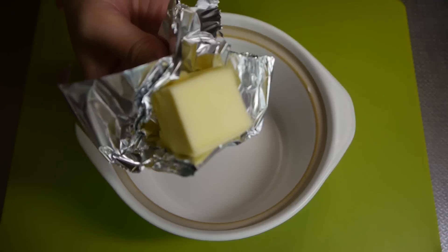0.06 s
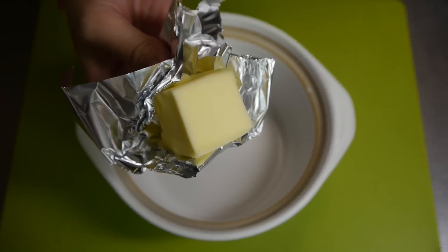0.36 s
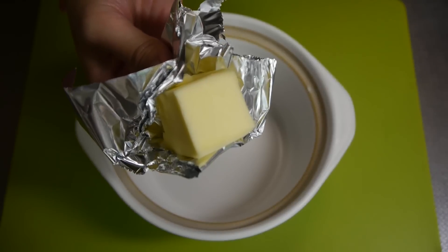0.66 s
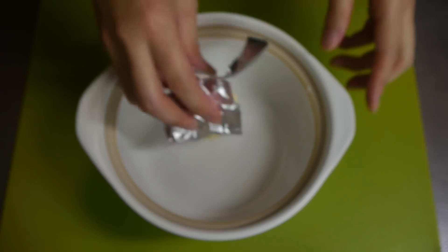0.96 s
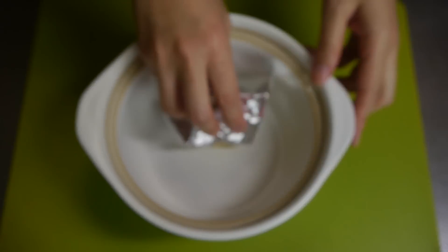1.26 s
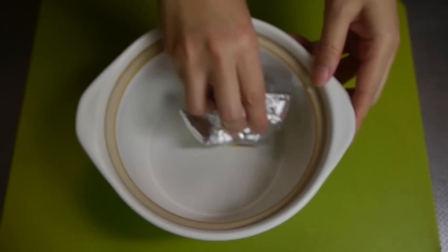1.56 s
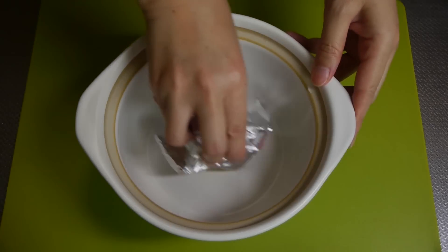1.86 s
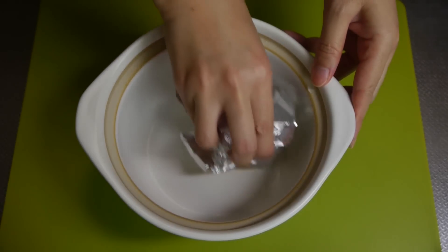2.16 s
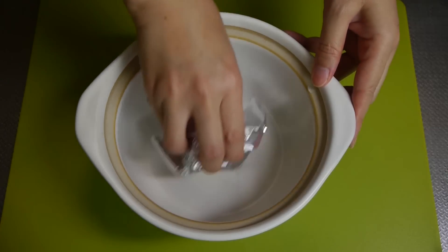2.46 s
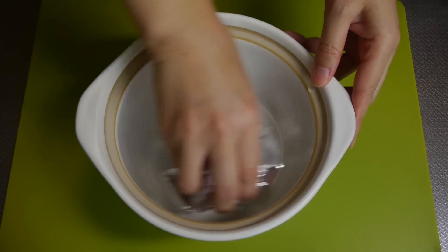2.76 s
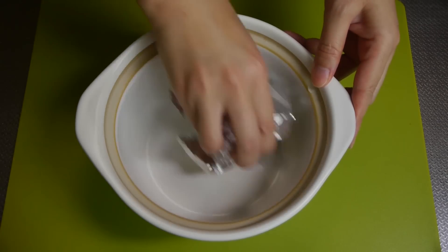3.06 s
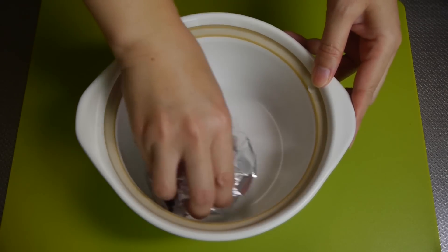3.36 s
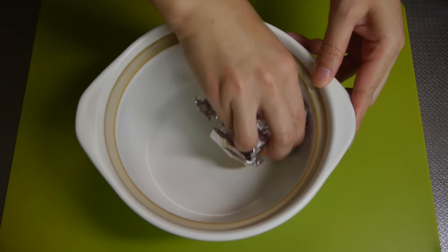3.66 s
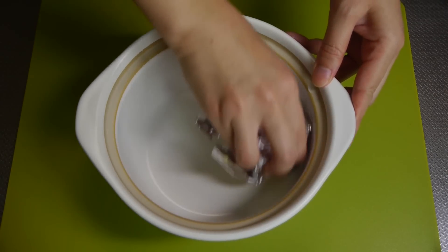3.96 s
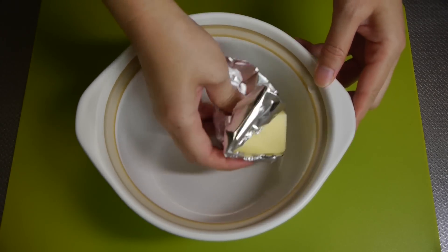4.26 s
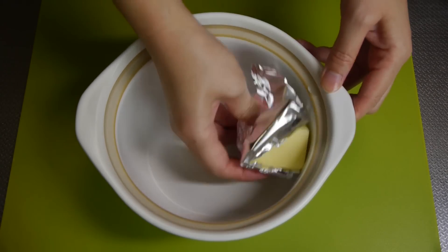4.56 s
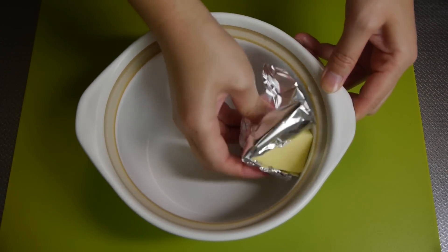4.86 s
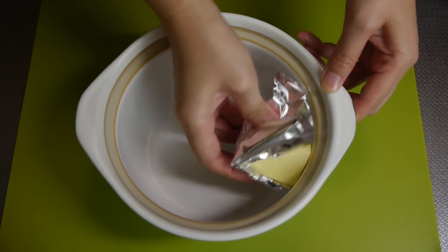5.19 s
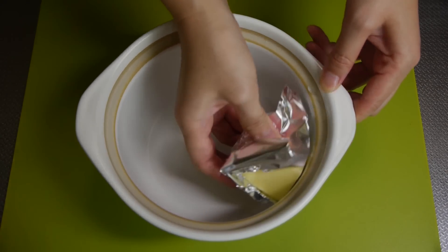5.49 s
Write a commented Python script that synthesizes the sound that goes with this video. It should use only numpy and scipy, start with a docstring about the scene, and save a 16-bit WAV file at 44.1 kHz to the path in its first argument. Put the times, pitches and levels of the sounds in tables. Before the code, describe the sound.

For the first second there is only a low kitchen rumble with a very faint electrical whine, a soft bump and a few tiny ticks and squeaks. At about 1 second, the foil around a block of butter crinkles sharply and scrapes over the glaze of a ceramic pot in quick, hissy, slightly hollow strokes. The pot bumps softly on its mat near 1.3 seconds. From 1.8 to 2.9 seconds the rubbing is lighter, with scattered crisp snaps and faint sticky smacks of butter. The strokes then build, strongest between 3.5 and 4.1 seconds, with crunchy crackles. Around 4.4 seconds comes a dull smack, with soft bumps just after, and the scraping shifts in tone. Short, uneven scrapes and crinkles continue until about 5.5 seconds. The sound is close and fairly dry, and the background dips slightly whenever the foil gets loud.

```python
"""Buttering a ceramic pot

A block of butter, held by its foil wrapper, is rubbed round a ceramic pot in a small kitchen.
Creases snap under the fingers, the grip squeaks, foil scrapes the glaze in strokes and the butter
smacks; the hollow between hand and pot colours the rubbing. The pot bumps softly on its mat, over a
room rumble and a faint whine. An automatic gain control ducks everything when the foil gets loud."""
import sys
import numpy as np
from scipy import signal
from scipy.fft import rfft, irfft
from scipy.io import wavfile
from scipy.ndimage import uniform_filter1d, map_coordinates

SR = 44100
rng = np.random.default_rng(int(sys.argv[2]) if len(sys.argv) > 2 else 0)


def wav_out(sig):
    """Save sig, one row per channel (or a flat mono array), as 16-bit PCM at SR to the path in sys.argv[1]."""
    wavfile.write(sys.argv[1], SR, np.round(np.clip(np.atleast_2d(sig).T, -1, 1) * 32767).astype(np.int16))


N = 243873
TIME = np.arange(N) / SR
CUTOFF_HZ = 16300

# The kitchen's rumble. Each row: frequency in Hz, relative level in dB.
ROOM_SPECTRUM = [(25, -18), (60, -4), (130, 0), (200, -1), (275, 3), (350, -7), (550, -11), (780, -12.5),
                 (1200, -20), (2500, -24.5), (4500, -26.5), (7000, -30.5), (16000, -34)]
# Faint electrical whine. Each row: pitch in Hz, RMS level in dB.
WHINE_TONES = [(3300, -73), (3348, -67), (4151, -74), (4301, -70), (4700, -72)]
# Soft bumps of hand and pot on the mat. Each row: start in seconds, strength in dB, low-pass in Hz.
MAT_BUMPS = [(0.004, -17.5, 76), (0.081, -19, 69.6), (1.339, -15.5, 300), (2.558, -34, 300),
             (3.051, -25, 200), (4.419, -27, 200), (4.674, -24.5, 150), (4.838, -47, 250)]
# The pot ringing on mat and worktop. Each row: pitch in Hz, gain in dB, 60 dB decay in seconds.
WORKTOP_MODES = [(37.5, -19, 0.23), (74, -3.5, 0.16), (144, -5.5, 0.26), (192, 5, 0.086),
                 (250.5, 1.5, 0.087)]
# The arm's weight shaking the worktop. Each row: time in seconds, level in dB.
ARM_TREMBLE = [(0, -40), (1.2, -75), (1.4, -50.5), (2.4, -47.5), (3.3, -58), (3.75, -39.5), (4.3, -58),
               (4.5, -35.5), (4.85, -37.5), (5.1, -49)]
# Creases buckling. Each row: start in seconds, level in dB, body in dB relative to that level,
# pitch of the foil facet in Hz.
CREASE_SNAPS = [(0.0222, -41.5, -2.5, 3970), (0.081, -51.5, 4.5, 3900), (0.802, -51, 3, 5240),
                (0.9608, -29, 5.5, 2900), (0.9887, -9, -10, 7340), (1.0143, -10.5, -13, 4100),
                (1.064, -12, -3.5, 4370), (1.124, -15.5, -4.5, 4400), (1.206, -16.5, -14, 10800),
                (1.2876, -12.5, -23, 3470), (1.4092, -9, -8, 10800), (1.5714, -12, -13, 8900),
                (1.611, -17.5, -2.5, 2900), (1.6258, -15, -15, 7900), (1.7565, -15.5, -3, 4000),
                (1.774, -19, -15, 11100), (1.801, -20, -9, 3140), (1.872, -21.5, -12, 11400),
                (1.899, -22, -45, 6260), (1.9626, -32, -2, 6100), (1.9928, -22.5, -19, 8470),
                (2.012, -18.5, -10.5, 10500), (2.0477, -30, -6, 9500), (2.182, -18, -12, 10600),
                (2.221, -16.5, -11, 8500), (2.2403, -13.5, -39, 8000), (2.251, -19, -4, 6600),
                (2.2916, -18, -24, 9300), (2.317, -18, -13, 7520), (2.3366, -22.5, -28, 4700),
                (2.3665, -21.5, -20, 6270), (2.388, -20, -15, 9700), (2.4226, -12.5, -9.5, 6100),
                (2.4544, -22.5, -20, 9100), (2.4757, -24, -25, 7100), (2.4997, -22, -13, 8300),
                (2.51, -28.5, -8, 3320), (2.547, -28.5, -4.5, 4540), (2.558, -26.5, -16, 5900),
                (2.598, -22.5, -29, 13000), (2.7108, -19.5, -12, 4770), (2.814, -26, -18, 6300),
                (2.8518, -29, -10, 6000), (2.869, -26.5, -10, 7550), (2.895, -22.5, -14, 8550),
                (2.9263, -11, -5.5, 9350), (2.929, -12, -12, 2400), (3.1292, -12.5, -14, 3900),
                (3.1574, -8.5, -14.5, 5900), (3.1804, -21.5, -21, 4970), (3.247, -21, -16.5, 8000),
                (3.2625, -7.5, -4.5, 3700), (3.2932, -14, -6.5, 4130), (3.4988, -11, -18, 8400),
                (3.5249, -6.5, -18, 5750), (3.6704, -16, -6.5, 3600), (3.7457, -14, 0.5, 3450),
                (3.95, -12.5, -30, 9300), (4.004, -11, -11, 4800), (4.19, -22, -13, 7460),
                (4.245, -24, -14, 9000), (4.274, -15.5, -32, 6840), (4.3142, -8.5, -41, 7900),
                (4.415, -14.5, -11, 2820), (4.45, -15.5, -3.5, 3600), (4.539, -31, -20, 9000),
                (4.5606, -14.5, -13, 3300), (4.754, -13.5, -8.5, 3300), (4.769, -22, -12, 3500),
                (4.783, -14, -9, 3580), (4.8419, -10.5, -23, 7650), (4.976, -16, -21, 9400),
                (5.0487, -21, -22, 4940), (5.2773, -14.5, -22, 4300)]
# The sharp and the dull part of a snap. Each row: frequency in Hz, relative level in dB.
CRACK_SPECTRUM = [(1500, -41), (3200, 2), (6000, 3), (9500, 3.5), (12000, -2), (16000, -12)]
BODY_SPECTRUM = [(350, -14), (620, -17), (820, -7.5), (1150, -6), (1650, -8.5), (3000, -0.5), (4500, -12.5),
                 (9000, -40)]
# Air ringing between hand and pot, with the block flat on the bottom or tipped against the wall.
# Each row: pitch in Hz, width in Hz, gain in dB.
FLAT_HOLLOW_MODES = [(777, 66, 3), (918, 107, -2), (1225, 62, -6.5), (1720, 190, 5), (2261, 44, 1.5),
                     (2700, 79, -33), (3560, 230, -8), (4400, 100, -37.5), (6260, 160, -36.5)]
TIPPED_HOLLOW_MODES = [(790, 50, -18), (1020, 66, -6), (1796, 150, 3.5), (2130, 99, -10), (2210, 180, 0),
                       (3610, 100, -6), (4660, 320, -7), (6940, 160, -3), (7940, 200, -31)]
# Faint squeaks of the grip. Each row: start in seconds, peak level in dB, pitch in Hz.
GRIP_SQUEAKS = [(0.698, -47, 2100), (0.706, -42, 780), (0.731, -50, 2190), (0.764, -55, 2150)]
# Foil resting lightly on the glaze between strokes. Each row: time in seconds, hiss level in dB.
LIGHT_CONTACT = [(0.94, -90), (0.99, -39), (1.72, -48), (1.84, -50), (1.92, -45.5), (2.15, -43.5),
                 (2.26, -37.5), (2.57, -50.5), (2.76, -45), (2.9, -34.5), (3.07, -33.5), (3.22, -39),
                 (3.47, -60), (3.89, -33), (3.98, -47), (4.15, -39.5), (4.27, -47.5), (5.5, -52)]
# Strokes of foil over glaze. Each row: start, rise and length in seconds, mid-stroke hiss in dB,
# swell across the stroke in dB, then rasp and low ring in dB relative to the hiss.
FOIL_STROKES = [(0.959, 0.006, 0.061, -21.5, 3, -6.5, -5.5), (1.027, 0.025, 0.14, -20, 5, -0.5, -4),
                (1.18, 0.017, 0.067, -26.5, 0.5, 3.5, -6.5), (1.24, 0.027, 0.15, -21, -3, 2.5, 0.5),
                (1.399, 0.02, 0.091, -26.5, 4.5, 2, 0.5), (1.476, 0.02, 0.094, -15, -1, -1, -7.5),
                (1.627, 0.037, 0.11, -15.5, -8.5, -6, -13), (2.595, 0.015, 0.079, -21.5, 3, -8.5, -9.5),
                (2.908, 0.0094, 0.083, -18.5, 4.5, -2, -13.5), (3.261, 0.0025, 0.095, -20, -7, -3.5, -23),
                (3.38, 0.021, 0.02, -23, 3.5, 1.5, -15), (3.489, 0.015, 0.2, -14, 5, -4, -13),
                (3.723, 0.068, 0.13, -10.5, -1.5, -6, -17), (3.993, 0.0093, 0.035, -13, 2, -1, -9.5),
                (4.043, 0.035, 0.055, -10.5, 0, -19, -32), (4.308, 0.004, 0.073, -14.5, -4.5, -12.5, -31),
                (4.401, 0.0046, 0.082, -22.5, 8, -18, -14), (4.553, 0.004, 0.042, -14, 0, -3.5, -17),
                (4.645, 0.0063, 0.021, -18.5, -2.5, -1.5, -12), (4.739, 0.0046, 0.05, -22, -8, -7, -16),
                (4.828, 0.0035, 0.043, -17, -4, -2, -16.5), (4.884, 0.037, 0.081, -23, 5.5, -6.5, -15),
                (5.045, 0.043, 0.14, -18.5, -9.5, -3, -11.5),
                (5.225, 0.025, 0.047, -22.5, -2.5, -1.5, -3.5), (5.309, 0.043, 0.11, -19, 3.5, 0, -11.5),
                (5.495, 0.018, 0.045, -22.5, -5, -0.5, -7.5)]
# How unevenly the foil catches. Each row: time in seconds, spread of the force in dB.
CATCH_SPREAD = [(1.0, 2), (1.75, 5.5), (2.3, 5.5), (2.65, 3.5), (3.1, 6), (3.6, 1.5), (4.4, 5), (5.3, 2.5)]
# Scrape colour with the block flat or tipped. Each row: frequency in Hz, relative level in dB.
FLAT_SPECTRUM = [(240, -62), (400, -1.5), (474, -12.5), (553, -4.5), (676, -7.5), (777, 1), (935, 2),
                 (1070, -0.5), (1600, -8.5), (2050, -10), (2290, -7.5), (4650, -2.5), (9180, -2.5),
                 (15000, -10), (16000, -31)]
TIPPED_SPECTRUM = [(240, -81.5), (400, -48), (616, -25), (789, -6), (1440, -5), (1630, 5.5), (1960, -5),
                   (2360, -3.5), (2970, -9.5), (3930, -10), (4440, -1), (5270, -9.5), (7750, -6),
                   (13900, -21.5), (16000, -30)]
# How much the foil's edge, not its face, meets the glaze. Each row: time in seconds, treble gain in dB.
EDGE_SPARKLE = [(1.0, -2), (1.7, 2), (2.65, -1.5), (3.0, 5), (3.3, -8), (3.52, 4.5), (3.68, 1), (3.82, -7),
                (4.0, -5.5), (4.1, 6), (4.35, -6), (4.6, 6.5), (5.4, 4)]
# Butter meeting or leaving the glaze, and at 4.415 s a dull knock of the pot. Each row: start in seconds, level
# in dB, low-pass in Hz.
BUTTER_SMACKS = [(1.927, -28.5, 2500), (1.949, -39, 2500), (2.098, -32, 3000), (2.256, -27, 1780),
                 (2.598, -26.5, 1480), (2.778, -28, 5000), (4.415, -16.5, 1140)]


def from_db(db):
    """Decibels to gain."""
    return 10 ** (np.asarray(db) / 20)


def rms_one(x):
    """Scale to unit power."""
    return x / np.sqrt(np.mean(x ** 2) + 1e-20)


def automation(rows):
    """Join time and value breakpoints into a curve, sample by sample."""
    return np.interp(TIME, *np.transpose(rows))


def drift(per_s):
    """A smooth random wobble of unit power, with so many new values a second."""
    points, coarse = rng.standard_normal(N // 50), TIME[::20]
    wobble = map_coordinates(points, [coarse * per_s], order=2, mode="nearest")
    return rms_one(np.interp(TIME, coarse, wobble))


def band(x, edges_hz, kind, order=3):
    """Butterworth filter."""
    sections = signal.butter(order, np.clip(edges_hz, 10, .45 * SR), kind, fs=SR, output="sos")
    return signal.sosfilt(sections, x)


def resonate(x, hz, width_hz):
    """One resonance with unity gain at its peak."""
    r = np.exp(-np.pi * width_hz / SR)
    feedback = [1, -2 * r * np.cos(2 * np.pi * hz / SR), r * r]
    return signal.lfilter(np.array([1, 0, -1]) * (1 - r * r) / 2, feedback, x + 1e-18)


def colour(x, spectrum, size=4096):
    """Minimum-phase EQ with the given curve and unit power gain."""
    hz, level_db = np.transpose(spectrum)
    grid = np.maximum(np.arange(size // 2 + 1) * SR / size, 1)
    cepstrum = irfft(np.log(from_db(np.interp(np.log(grid), np.log(hz), level_db))))
    cepstrum[1:size // 2] *= 2
    cepstrum[size // 2 + 1:] = 0
    pulse = irfft(np.exp(rfft(cepstrum)))
    return signal.fftconvolve(x, pulse / np.linalg.norm(pulse))[:len(x)]


def add(track, start_s, sound):
    """Mix a short sound into a track."""
    start = max(int(start_s * SR), 0)
    track[start:start + len(sound)] += sound[:N - start]


def room_tone(level_db=-43):
    """The kitchen's bed of steady, rumbling noise."""
    return from_db(level_db) * colour(rng.standard_normal(N), ROOM_SPECTRUM)


def whine():
    """Thin electrical tones that waver slightly."""
    return sum(from_db(level_db) * np.sqrt(2) * np.sin(2 * np.pi * hz * TIME + .5 * drift(6.3))
               for hz, level_db in WHINE_TONES)


def worktop(tremble_hz=34, squash_s=0.0048):
    """Bumps ring the pot on its mat; the leaning arm keeps the worktop trembling."""
    bumps, t = np.zeros(N), TIME[:SR // 2]
    for start_s, strength_db, dull_hz in MAT_BUMPS:
        ring = sum(from_db(db + 2 * rng.standard_normal() - 60 * t / t60) * np.sin(2 * np.pi * hz * t)
                   for hz, db, t60 in WORKTOP_MODES)
        attack = 1 - np.exp(-t / squash_s)
        add(bumps, start_s, from_db(strength_db) * band(ring * attack, dull_hz, "low", order=2))
    tremble = band(resonate(rng.standard_normal(N), tremble_hz, width_hz=7), 36, "low")
    return bumps + from_db(automation(ARM_TREMBLE)) * rms_one(tremble)


def snaps(hiss_db, free_t60=0.018, dragged_t60=0.059, full_drag_db=-23, crack_t60=0.0014):
    """A crease flips with a crack and a dull body; hard rubbing draws it out into a crunch."""
    sharp, dull, t = np.zeros(N), np.zeros(N), TIME[:SR // 10]
    span = np.sqrt(SR / 100)   # levels count a snap's energy as packed into 10 ms
    for start_s, level_db, body_db, hz in CREASE_SNAPS + crinkles(hiss_db):
        drag = min(from_db(hiss_db[int(start_s * SR)] - full_drag_db), 1)
        t60 = free_t60 + (dragged_t60 - free_t60) * drag ** 2
        rattle, knock = rng.standard_normal((2, len(t)))
        spike = from_db(10 - 60 * t / crack_t60) * crack_t60 / t60
        crack = colour(rattle * (spike + from_db(-60 * t / t60)), CRACK_SPECTRUM, size=512)
        # a crease that barely stirs the pot is a small free facet, with little sound below its pitch
        low_cut_hz = hz * np.clip(body_db / -38, .25, .75)
        crack = band(ringing_facets(crack, hz), low_cut_hz, "high", order=4)
        body = knock * from_db(-60 * t / (t60 + 0.002))
        add(sharp, start_s, from_db(level_db) * span * crack / np.linalg.norm(crack))
        add(dull, start_s, from_db(level_db + body_db) * span * body / np.linalg.norm(body))
    return sharp + from_db(-1.5) * hollow(colour(dull, BODY_SPECTRUM), FLAT_HOLLOW_MODES)


def ringing_facets(crack, hz):
    """A crack rings its own facet of foil and, faintly, three neighbours."""
    pitches = np.minimum(hz * rng.uniform(0.58, 2.05, size=3), CUTOFF_HZ)
    neighbours = sum(resonate(crack, pitch, width_hz=450) for pitch in pitches)
    return crack + from_db(2.5) * resonate(crack, hz, width_hz=900) + from_db(-17) * neighbours


def hollow(x, modes):
    """The direct sound plus the air ringing between hand and pot."""
    return x + sum(from_db(gain_db) * resonate(x, hz, width) for hz, width, gain_db in modes)


def echoes(x, t60, delay_s, top_hz):
    """Dense reflections that arrive after a pre-delay and die away."""
    t = TIME[:SR // 2]
    tail = rng.standard_normal(len(t)) * from_db(-60 * t / t60) * (t > delay_s)
    tail = band(tail, top_hz, "low", order=1)
    return signal.fftconvolve(x, tail / np.linalg.norm(tail))[:N]


def pot_wall(x, paths=4):
    """Reflections inside the pot; the moving hand keeps changing which paths are open."""
    weights = np.array([drift(9) for _ in range(paths)])
    weights /= np.linalg.norm(weights, axis=0)
    return sum(weight * echoes(x, t60=0.058, delay_s=0.00085, top_hz=9000) for weight in weights)


def squeaks(length_s=0.023, sag=.02):
    """The gripped block gives brief tones that swell, fade and sag a little in pitch."""
    out, progress = np.zeros(N), np.linspace(0, 1, int(length_s * SR))
    for start_s, level_db, hz in GRIP_SQUEAKS:
        phase = 2 * np.pi * hz * np.cumsum(1 + sag * (.5 - progress)) / SR
        add(out, start_s, from_db(level_db) * np.sin(np.pi * progress) * np.sin(phase))
    return out


def stroke_envelopes(release_db_per_s=378, press_lag_s=0.004):
    """Hiss, rasp and low ring in dB: strokes rise, swell or sag, then die away as the hand slows."""
    contact_db = automation(LIGHT_CONTACT)
    power = from_db([contact_db, contact_db - 1.5, contact_db - 10]) ** 2
    for start_s, rise_s, length_s, hiss_db, swell_db, rasp_db, low_db in FOIL_STROKES:
        t = TIME[:int((length_s + .25) * SR)]
        ramp_db = swell_db * (np.minimum(t / length_s, 1) - .5)
        release_db = release_db_per_s * np.maximum(t - length_s, 0)
        stroke = from_db(hiss_db + ramp_db - release_db)
        for track, layer_db, lag_s in zip(power, (0, rasp_db, low_db), (0, press_lag_s, press_lag_s)):
            attack = np.minimum(t / (rise_s + lag_s), 1)
            add(track, start_s, (from_db(layer_db) * stroke * attack) ** 2)
    return 10 * np.log10(power)


def levelled(x, window):
    """Hold the power near one over a sliding window of samples."""
    return x / np.sqrt(uniform_filter1d(x ** 2, size=window) + 1e-9)


def slips(per_s=9000, clumping=0.37):
    """Foil catches and slips on the glaze in tiny, uneven ticks that come in clumps."""
    ticks = (rng.random(N) < per_s / SR) * rng.choice([-1, 1], N)
    catch = np.minimum(rng.exponential(1, N), 5) + clumping * drift(260)
    return levelled(ticks * from_db(automation(CATCH_SPREAD) * catch), window=1300)


def palm_echo(x, gain=0.16, delay_s=0.000881):
    """The echo off the moving palm sweeps a comb through the scrape."""
    lag_s = delay_s * np.exp(0.265 * drift(7))
    return x + gain * map_coordinates(x, [(TIME - lag_s) * SR], order=3)


def wavering_facets(x, count=16, ring_db=-2, waver_db=6):
    """Flat patches of foil ring along with the scrape, each swelling and fading as the grip shifts."""
    pitches = np.geomspace(1300, 10500, count) * np.exp(0.079 * rng.standard_normal(count))
    rings = (resonate(x, hz, width_hz=230 * np.sqrt(hz / 4000)) for hz in pitches)
    return x + sum(from_db(ring_db + waver_db * np.tanh(drift(8))) * ring for ring in rings)


def sparkle(x, corner_hz=10000):
    """The foil's edge lifts the top octave; its flat face dulls it."""
    top = band(band(x, corner_hz, "high", order=2), corner_hz, "high", order=2)
    rest = band(band(x, corner_hz, "low", order=2), corner_hz, "low", order=2)
    return rest + from_db(automation(EDGE_SPARKLE)) * top


def scrape(hiss_db, rasp_db, low_db, tip_at_s=4.25, crossfade_s=0.1, flutter_db=1.18):
    """Slipping foil sounds through the hollow, with the block first flat, then tipped to the wall."""
    force = wavering_facets(palm_echo(slips()))
    flat = rms_one(hollow(colour(force, FLAT_SPECTRUM), FLAT_HOLLOW_MODES))
    tipped = rms_one(hollow(colour(force, TIPPED_SPECTRUM), TIPPED_HOLLOW_MODES))
    tilt = np.clip((TIME - tip_at_s) / crossfade_s, 0, 1)
    friction = (1 - tilt) * flat + tilt * tipped
    hiss = sparkle(band(friction, 2760, "high", order=5))
    rasp = band(friction, [1300, 3200], "band", order=4)
    low_ring = band(band(friction, 1113, "low", order=5), 620, "high")
    return sum(levelled(layer, window=4000) * from_db(level_db + flutter_db * drift(45))
               for layer, level_db in [(hiss, hiss_db), (rasp, rasp_db), (low_ring, low_db)])


def crinkles(hiss_db, per_s=14, below_hiss_db=6.5, body_db=-7.5, low_hz=2950, high_hz=10800):
    """Extra snap rows: small creases give way at random, as loud as the rubbing is hard."""
    when, size, pitch = rng.random((int(per_s * N / SR), 3)).T
    level_db = hiss_db[(when * N).astype(int)] - below_hiss_db + (size - .5)
    pitch_hz = low_hz * (high_hz / low_hz) ** pitch
    return [(start_s, db, body_db, hz) for start_s, db, hz in zip(when * N / SR, level_db, pitch_hz)]


def smacks(t60=0.032, low_cut_hz=700):
    """Butter sticks and lets go with a short, dull puff, and the pot once gives a dull knock; each rings the
    hollow under the hand."""
    out, t = np.zeros(N), TIME[:SR // 10]
    for start_s, level_db, dull_hz in BUTTER_SMACKS:
        puff = band(band(rng.standard_normal(len(t)), dull_hz, "low"), low_cut_hz, "high")
        add(out, start_s, from_db(level_db - 60 * t / t60) * rms_one(puff))
    return hollow(out, FLAT_HOLLOW_MODES)


def gain_control(x, threshold_db=-28, slope=0.46, attack_s=0.076, release_db_per_s=9):
    """Loud sound ducks the gain quickly; it creeps back afterwards."""
    r = np.exp(-1 / (attack_s * SR))
    level_db = 10 * np.log10(signal.lfilter([1 - r], [1, -r], x * x) + 1e-9)
    release_db = release_db_per_s * TIME
    held_db = np.maximum.accumulate(level_db + release_db, axis=-1) - release_db
    return x * from_db(-slope * np.maximum(held_db - threshold_db, 0))


def scene():
    """The mono mix: foil and butter, their reflections in pot and kitchen, the bed and the bumps."""
    hiss_db, rasp_db, low_db = stroke_envelopes()
    rubbing = from_db(0.04) * scrape(hiss_db, rasp_db, low_db) + snaps(hiss_db) + smacks() + squeaks()
    in_pot = from_db(-12.5) * pot_wall(rubbing)
    in_room = from_db(-17) * echoes(rubbing, t60=0.23, delay_s=0.0061, top_hz=7500)
    return (rubbing + in_pot + in_room + room_tone() + whine() + worktop())[None]


def record(dry):
    """The master chain: the gain rides the level, the sharpest peaks clip, the very top is cut."""
    clipped = np.clip(gain_control(dry), -.95, .95)
    return signal.sosfilt(signal.ellip(10, .1, 80, CUTOFF_HZ, fs=SR, output="sos"), clipped)


dry = scene()
out = record(dry)
wav_out(out)
```